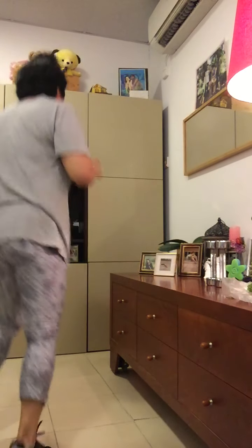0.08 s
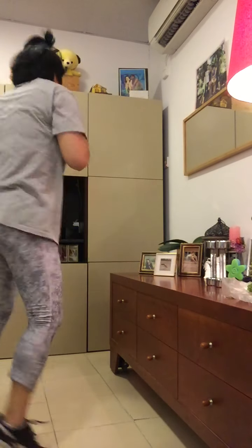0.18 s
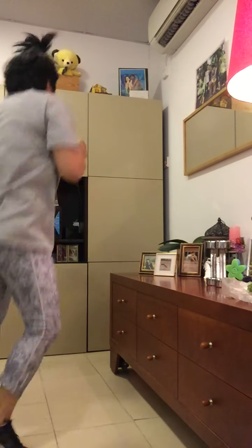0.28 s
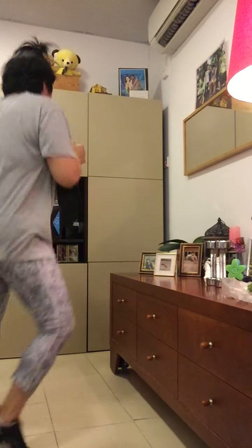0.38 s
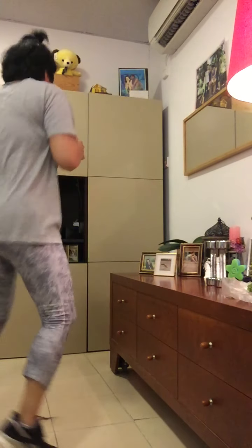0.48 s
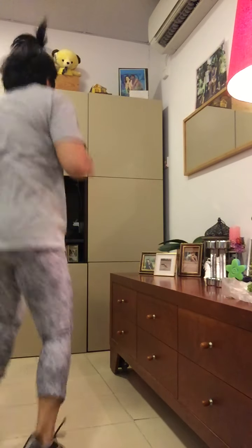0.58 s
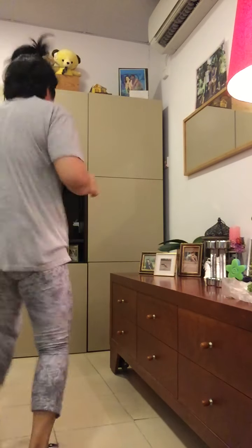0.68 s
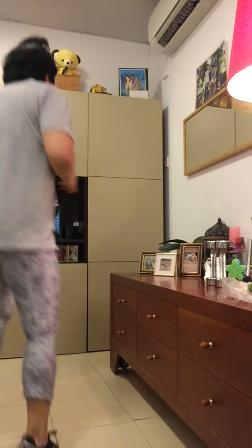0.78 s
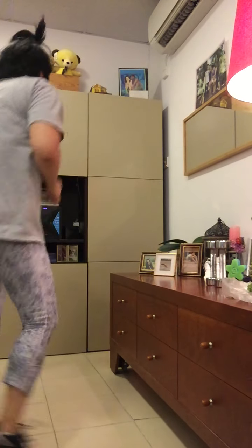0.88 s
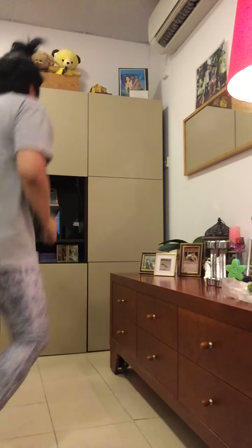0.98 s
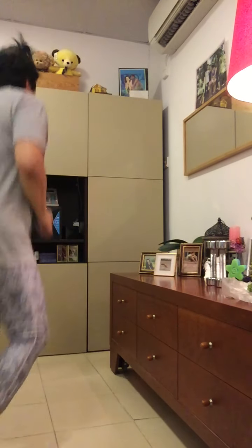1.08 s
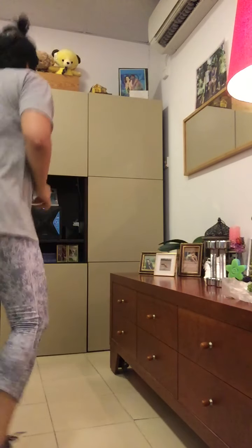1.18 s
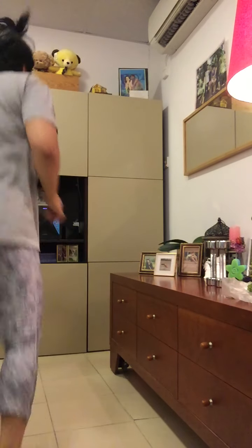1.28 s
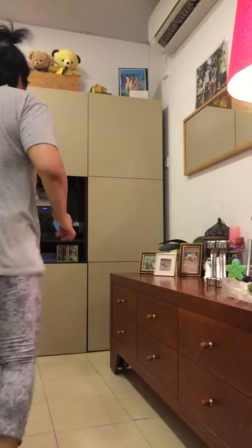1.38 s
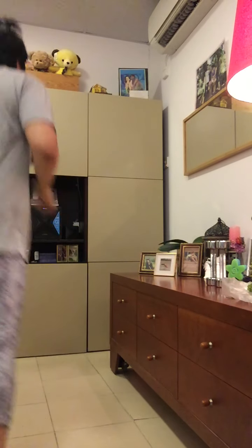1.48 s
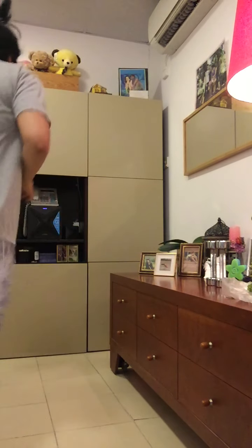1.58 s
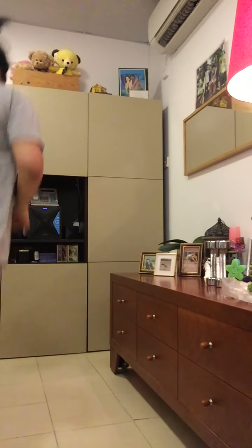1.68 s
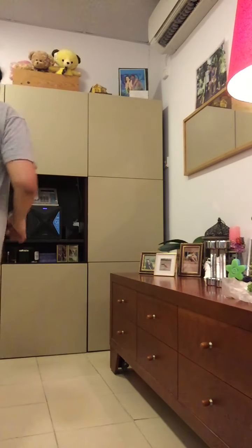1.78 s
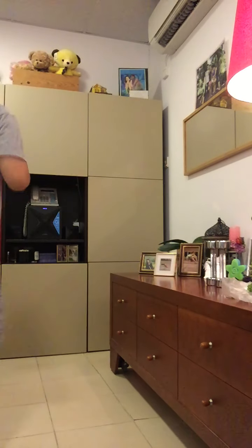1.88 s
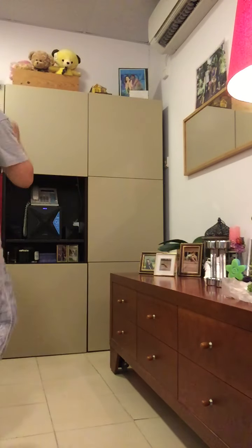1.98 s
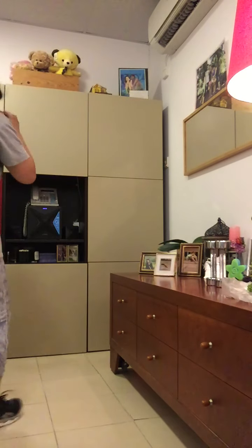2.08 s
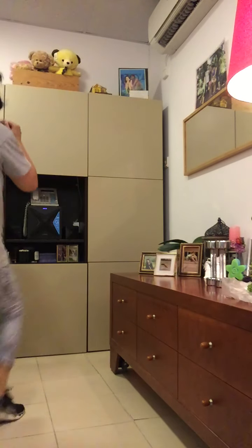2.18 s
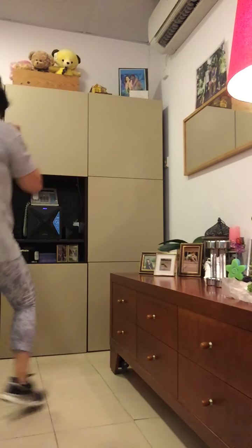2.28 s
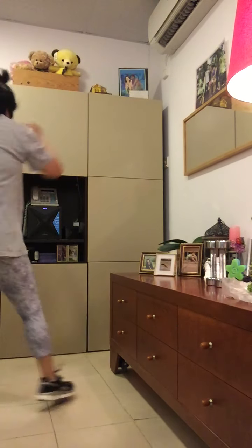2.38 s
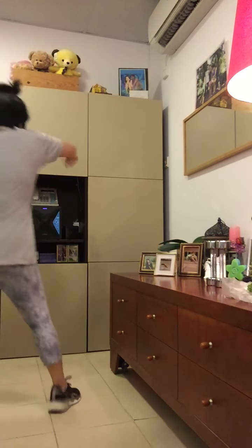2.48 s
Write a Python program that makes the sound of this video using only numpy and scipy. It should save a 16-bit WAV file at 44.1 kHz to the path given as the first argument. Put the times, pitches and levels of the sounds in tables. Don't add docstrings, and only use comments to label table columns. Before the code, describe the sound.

Rubber-soled steps on a tiled floor, irregular taps and soft scuffs between very short high squeaks, picked up by a small microphone in a hard, lively home room with a quiet low household hum.

```python
import sys
import numpy as np
from scipy import signal
from scipy.fft import rfft, irfft, next_fast_len
from scipy.io import wavfile
from scipy.ndimage import map_coordinates

SR = 44100
rng = np.random.default_rng(int(sys.argv[2]) if len(sys.argv) > 2 else 0)


def ratio(d):
    e = np.asarray(d, float) / 20
    return 10 ** e


def unload_audio(sound):
    columns = np.transpose(np.atleast_2d(sound))
    steps = np.round(np.clip(columns, -1, 1) * 32767)
    wavfile.write(sys.argv[1], SR, steps.astype(np.int16))


N = 112455

# start_s, length_s, start_pitch_hz, end_pitch_hz, level_db
CHIRPS = [(0.231, 0.0096, 2676, 2513, -26), (0.242, 0.013, 2610, 2988, -29),
          (0.6204, 0.0049, 3060, 3040, -41), (0.902, 0.015, 3416, 2667, -40),
          (0.918, 0.01, 2778, 2790, -42.5), (1.25, 0.00515, 2890, 4290, -52.5),
          (1.2551, 0.00362, 4640, 3240, -39.5), (1.5903, 0.0052, 2484, 2662, -25.5),
          (1.596, 0.0098, 2780, 2221, -33), (1.617, 0.0039, 2560, 2510, -33),
          (1.693, 0.0096, 5840, 5840, -49), (2.2227, 0.0062, 3014, 2970, -36.5),
          (2.227, 0.0057, 2970, 3460, -31)]
# second_db, third_db, fourth_db, fifth_db, sixth_db
HARMONICS = [(0, -11.5, -25.5, -30, -49), (-5, -21.5, -30.5, -27, -41), (-13, -30, -38, -47, -50),
             (-23.5, -45, -47, -61, -48), (-19.5, -41, -45, -50, -53), (-37, -44, -45, -50, -55),
             (-36, -47, -44, -50, -55), (-14, -22.5, -38, -27, -51), (-3, -18.5, -28.5, -40, -52.5),
             (-22, -26, -30, -38, -43), (-35, -40, -50, -55, -60), (1.5, 7.5, -4.5, -8, -27),
             (-13, -44, -14, -22, -40)]
# start_s, click_db, click_hz, thud_db, thud_hz
IMPACTS = [(.036, -44, 3080, -49.5, 427), (0.302, -53, 1530, -43, 460), (.437, -62, 1500, -57, 390),
           (0.627, -30, 2130, -35, 586), (0.689, -40.5, 2260, -40, 370), (.829, -46.5, 1500, -58, 885),
           (0.9841, -41.5, 4300, -31, 740), (1.3363, -41, 1880, -38.5, 311),
           (1.4066, -40, 4120, -41.5, 376), (1.699, -43, 1500, -42.5, 850),
           (1.821, -55.5, 1057, -43.5, 600), (2.222, -46, 2360, -42.5, 765)]
# start_s, length_s, level_db, centre_hz
STROKES = [(.005, 0.026, -65.5, 1900), (0.136, 0.036, -62, 2700), (0.22, .012, -51.5, 4600),
           (0.329, 0.025, -53, 1850), (.47, 0.053, -72, 1810), (0.541, 0.21, -70.5, 2030),
           (0.642, 0.054, -57.5, 2350), (0.84, 0.053, -69.5, 3570), (0.875, 0.011, -90, 3200),
           (1.032, 0.039, -59.5, 1490), (1.07, 0.024, -61.5, 3370), (1.157, 0.028, -62.5, 3010),
           (1.227, 0.027, -62, 2600), (1.368, 0.025, -60, 1580), (1.438, 0.012, -63, 1200),
           (1.515, 0.018, -58.5, 3600), (1.565, 0.044, -60.5, 3500), (1.718, 0.034, -57, 2050),
           (1.845, 0.025, -63.5, 1467), (1.928, 0.037, -65.5, 3870), (2.103, .05, -78, 1600),
           (2.215, 0.033, -49, 5600), (2.426, .03, -84, 1470)]
# frequency_hz, t60_s
REVERBERATION = [(200, 0.29), (800, 0.29), (2700, 0.34), (5500, 0.34), (9000, 0.25), (15000, 0.22)]
# delay_s, level_db
REFLECTIONS = [
    (.0072, -3),
    (.013, -4.5),
]
# frequency_hz, density_db
HUM_SPECTRUM = [(30, -8.5), (150, 2), (380, -13.5), (520, -25.5), (1600, -23), (4000, -27.5), (8000, -34),
                (16000, -46)]
# frequency_hz, width_hz, level_db over the hum
ROOM_MODES = [
    (49.8, 14, -2),
    (148.2, 10, -7),
    (367, 30, -12.5),
]

EDGE_S = 0.0018
PITCH_WANDER, PITCH_WANDER_HZ = 0.021, 500
FLUTTER_DB, FRAY_DB = -0.5, -16.5
BASS_CUT_SHARE = 0.27
CLICK_T60_S = 0.0022
CLICK_WIDTH, THUD_WIDTH, SCUFF_WIDTH = 0.49, 0.5, 1.6
TREAD_TOP_HZ = 6120
GRIT_DB, STROKE_PEAK = 7, 0.24
TAIL_DB, TAIL_RISE_S = 7, 0.0024
HUM_DB = -59.5


def squeaks():
    out = np.zeros(N)
    t = np.arange(2048) / SR
    for (start_s, length_s, pitch0_hz, pitch1_hz, level_db), tones_db in zip(CHIRPS, HARMONICS):
        glide = pitch0_hz + (pitch1_hz - pitch0_hz) * np.clip(t / length_s, 0, 1)
        pitch_hz = glide * (1 + PITCH_WANDER * wobble(len(t), PITCH_WANDER_HZ))
        phase = 2 * np.pi * np.cumsum(pitch_hz) / SR
        stack = np.zeros(len(t))
        for order, tone_db in enumerate((0, *tones_db), 1):
            audible = order * pitch_hz < SR / 2
            stack += ratio(tone_db) * np.sin(order * phase) * audible
        fray = 1 + ratio(FRAY_DB) * wobble(len(t), 2914)
        envelope = np.clip(np.minimum(t, length_s + EDGE_S - t) / EDGE_S, 0, 1) ** 2
        level = ratio(level_db + FLUTTER_DB * wobble(len(t), 340))
        corner_hz = BASS_CUT_SHARE * pitch0_hz
        chirp = filtered(level * envelope * fray * stack, lambda f: (1j * f / (corner_hz + 1j * f)) ** 4)
        add_in_room(out, start_s, chirp)
    return out


def taps():
    out = np.zeros(N)
    t = np.arange(2048) / SR
    for start_s, click_db, click_hz, thud_db, thud_hz in IMPACTS:
        burst = rng.standard_normal(len(t)) * ratio(-60 * t / CLICK_T60_S)
        impulse = 1. * (t == 0)
        click = through_tread(burst, click_hz, CLICK_WIDTH)
        thud = through_tread(impulse, thud_hz, THUD_WIDTH)
        click = ratio(click_db) * click / abs(click).max()
        thud = ratio(thud_db) * thud / abs(thud).max()
        add_in_room(out, start_s, click + thud)
    return out


def scuffs():
    out = np.zeros(N)
    t = np.arange(4096) / SR
    for start_s, length_s, level_db, centre_hz in STROKES:
        grit = rng.standard_normal(len(t)) * ratio(GRIT_DB * wobble(len(t), 600))
        rub = unit(through_tread(grit, centre_hz, SCUFF_WIDTH))
        stroke = np.interp(t / length_s, [0, STROKE_PEAK, 1], [0, 1, 0])
        add_in_room(out, start_s, ratio(level_db) * rub * stroke)
    return out


def through_tread(x, centre_hz, width_share):
    resonance = peak(centre_hz, width_share * centre_hz)

    def response(f):
        tread = 1 / (1 + 1j * f / TREAD_TOP_HZ * 1.806 - (f / TREAD_TOP_HZ) ** 2) ** 2
        return tread * resonance(f)

    return filtered(x, response)


def add_in_room(out, start_s, contact):
    hz, t, bands = signal.stft(rng.standard_normal(SR // 2), SR, nperseg=256)
    decay = ratio(-60 * t / along(REVERBERATION, hz)[:, None])
    tail = signal.istft(bands * decay, SR, nperseg=256)[1]
    tail = tail * (1 - np.exp(-(np.arange(len(tail)) / SR / TAIL_RISE_S) ** 2))
    answer = ratio(TAIL_DB) * tail / np.linalg.norm(tail)
    answer[0] = 1
    for delay_s, level_db in REFLECTIONS:
        answer[round(delay_s * SR)] += ratio(level_db + rng.normal(0, 1.5))
    start = round(start_s * SR)
    heard = signal.fftconvolve(contact, answer)[:N - start]
    out[start:][:len(heard)] += heard


def background():
    hum = unit(filtered(rng.standard_normal(N), lambda f: ratio(along(HUM_SPECTRUM, f))))
    total = hum * ratio(1.7 * wobble(N, 9.9))
    for mode_hz, width_hz, level_db in ROOM_MODES:
        mode = unit(filtered(rng.standard_normal(N), peak(mode_hz, width_hz)))
        total += ratio(level_db + 6.1 * wobble(N, 4.2)) * mode
    return ratio(HUM_DB - 1.5) * total


def peak(hz, width_hz):
    return lambda f: 1j * f * width_hz / (hz * hz - f * f + 1j * f * width_hz)


def filtered(x, response):
    size = next_fast_len(len(x) + 4096)
    spectrum = rfft(x, size) * response(np.fft.rfftfreq(size, 1 / SR))
    return irfft(spectrum, size)[:len(x)]


def wobble(size, rate):
    return map_coordinates(rng.standard_normal(size + 4), [np.arange(size) * rate / SR])


def along(points, hz):
    f, value = np.transpose(points)
    return np.interp(np.log(hz + 1), np.log(f + 1), value)


def unit(x):
    return x / np.sqrt(np.mean(x ** 2) + 1e-20)


def scene():
    return (squeaks() + taps() + scuffs() + background())[None]


def top_cut(x):
    return signal.sosfilt(signal.butter(12, 16810, fs=SR, output="sos"), x)


def record(dry):
    mix = filtered(dry[0], lambda f: (f < 16000) / np.sqrt(1 + (38 / (f + 1)) ** 8))
    return top_cut(mix[None])


dry = scene()
out = record(dry)
unload_audio(out)
```